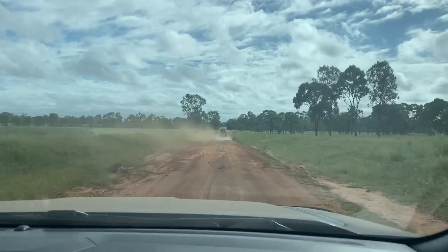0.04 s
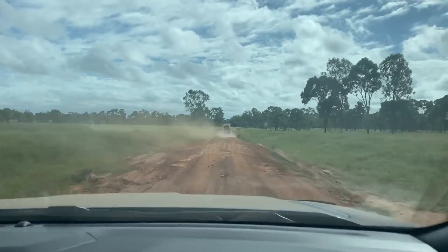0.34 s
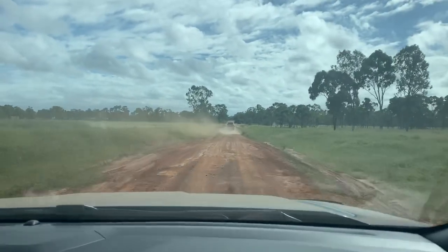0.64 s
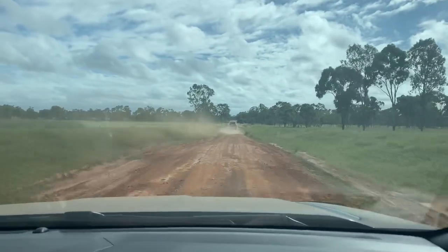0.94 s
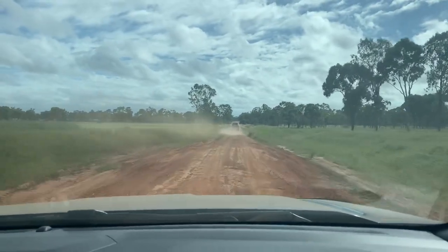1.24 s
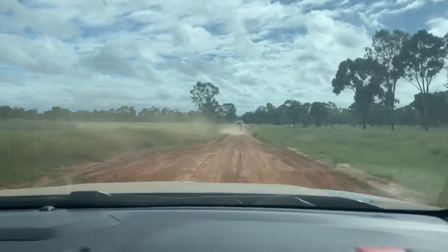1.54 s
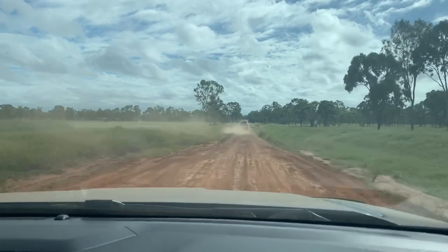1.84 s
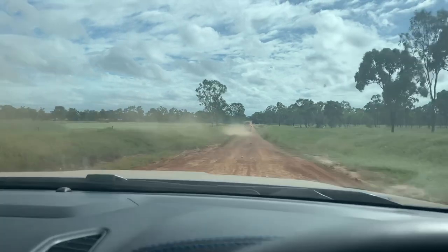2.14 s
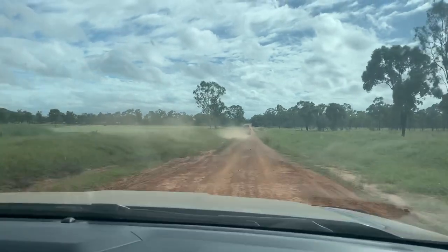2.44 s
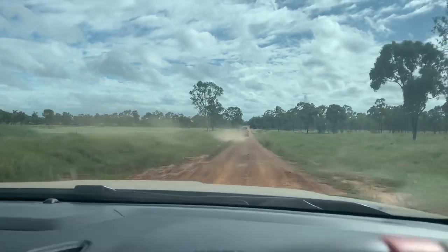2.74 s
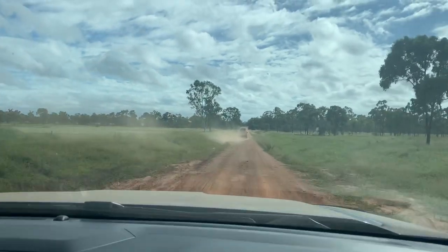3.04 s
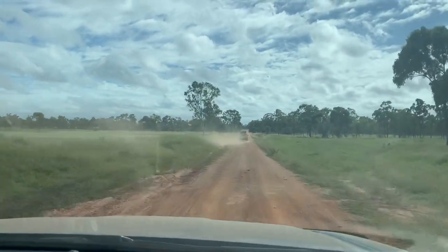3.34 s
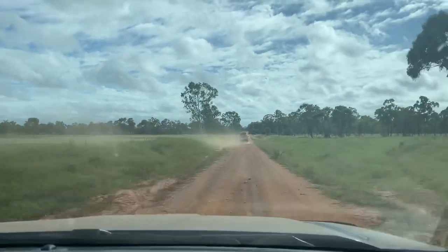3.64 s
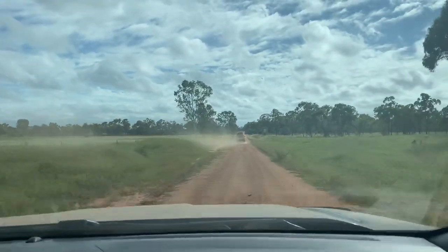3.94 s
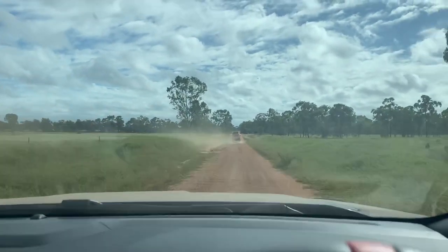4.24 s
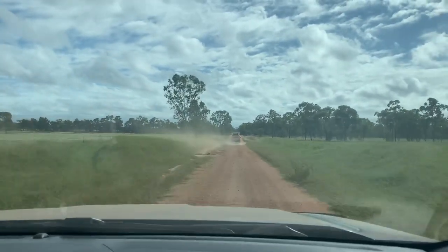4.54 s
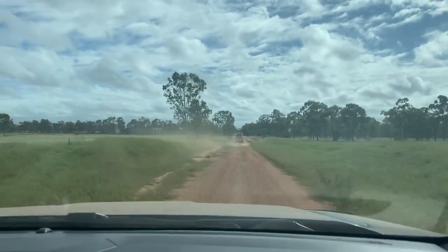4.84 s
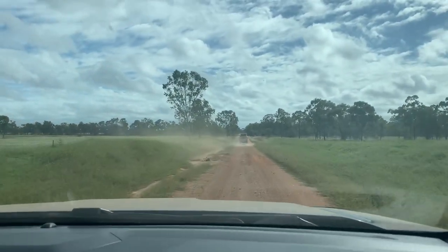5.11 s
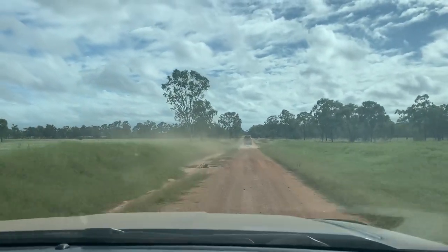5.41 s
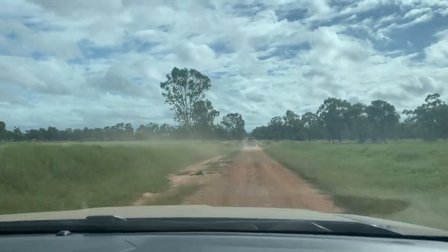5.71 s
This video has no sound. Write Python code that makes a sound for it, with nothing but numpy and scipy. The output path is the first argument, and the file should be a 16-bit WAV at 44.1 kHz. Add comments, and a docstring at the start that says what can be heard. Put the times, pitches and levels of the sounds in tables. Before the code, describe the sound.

From inside a vehicle cab, a deep, uneven chassis rumble and drumming panels run for the whole six seconds, along with the throbbing roar of tyres and a softer crunch of dirt on a corrugated road. At about 0.2 seconds a rut gives a low thud and a suspension knock. Loose trim and gear clink and chatter lightly until around 2.3 seconds, then ease off. A very faint drivetrain whine swells around 3 seconds and slowly fades. At about 3.3 seconds a loose metal piece clanks twice in quick succession, bright and short, over another thud. From 4 seconds the rattling and clinking build again. The roughest part comes between 4.7 and 5.6 seconds, with a cluster of deep thumps and hard knocks, strongest just after 5 seconds, and louder tyre roar and crunch. Rumble and rattle carry on to the end.

```python
"""Cab on a corrugated dirt road.

Ridges shake the chassis and drum the panels over the roar of the tyres; ruts thump the suspension.
Loose trim and gear chatter and clink on the rougher stretches, and a metal piece clanks twice.
A faint drivetrain whine swells on the smooth stretch."""
import sys
import numpy as np
from scipy import signal
from scipy.fft import rfft, irfft, next_fast_len
from scipy.io import wavfile
from scipy.ndimage import uniform_filter1d

SR = 44100
rng = np.random.default_rng(int(sys.argv[2]) if len(sys.argv) > 2 else 0)


def store_pcm(level_fs):
    """Save levels as 16-bit WAV."""
    pcm = np.round(np.clip(level_fs, -1, 1) * 32767).astype(np.int16)
    wavfile.write(sys.argv[1], SR, np.atleast_2d(pcm).T)


N = 263277
TIME_S = np.arange(N) / SR
HIT_S = np.arange(12000) / SR


def road(ridges_hz=23.27, uneven=.35, loose=.68):
    """Wheel force (a kick per uneven ridge plus loose dirt) and the load cycle over the ridges."""
    wander = unit(uniform_filter1d(rng.standard_normal(N), 2000))
    ridges = np.cumsum(ridges_hz * (1 + uneven * wander)) / SR
    kicks = np.diff(np.floor(ridges), prepend=0) * rng.uniform(.58, 1, N)
    force = loose * rng.standard_normal((2, N))
    force[0] += (1 - loose) * unit(kicks - kicks.mean())
    return force, np.cos(2 * np.pi * ridges)


def cab(force, drum_trim_db=.6, swell_s=.018):
    """Road force rings the low chassis modes and drums the panels."""
    # shaking: time_s, rumble_db, drum_db
    shake = [(0.02, -13, -44), (0.1, -34.5, -33), (.18, -17, -31), (0.23, -17.5, -16.5),
             (0.33, -20.5, -32.5), (0.79, -21, -31.5), (1.72, -23.5, -29.5), (1.81, -21, -34.5),
             (2.03, -20.5, -28.5), (3.21, -19, -28), (4.52, -22, -30.5), (4.83, -16.5, -25.5),
             (4.93, -18, -32), (5.19, -24.5, -27), (5.23, -12.5, -29), (5.5, -24, -28), (5.9, -19.5, -27)]
    # brief swells and dips in the rumble and drumming: centre_s, rumble_lift_db, drum_lift_db
    swells = [(.971, -9, -7), (1.124, -7, 3), (1.284, 3, 4.5), (1.356, -3, -3), (1.457, -5, -10),
              (1.541, 10.5, 3.5), (2.133, 2.5, 10), (2.229, 4.5, -0.5), (2.541, -5.5, -2.5),
              (2.648, -3.5, -2), (2.775, -11.5, 0.5), (2.86, 4.5, -5), (2.93, -4.5, 0.5), (3.02, 6.5, 0),
              (3.069, -1, 3), (3.147, -7, -8), (3.268, 1, -11), (3.428, -0.5, 2), (3.931, 0.5, 6.5),
              (4.346, -3, -4), (4.607, 5.5, -4), (4.697, -9, 0.5), (4.949, -10, 2.5), (5.171, 11, 4),
              (5.245, 2, 1), (5.285, -5.5, -2), (5.408, 7.5, 2), (5.733, 2.5, 7), (5.804, 5, -12)]
    # body sway spectrum: freq_hz, level_db
    sway = [(4, -26), (10, -21), (20, -15), (30, -12), (62, -13), (78, -24), (120, -45), (1000, -120)]
    # chassis and cab air resonances: centre_hz, width_hz, level_db
    chassis_modes = [(30, 11, -3), (45, 10, 0), (56, 9, -5), (67, 6, -4)]
    # panel resonances: centre_hz, width_hz, level_db
    panel_modes = [(98, 15.2, -1), (120.1, 25, 2), (145.4, 15, -1), (168, 25, -9.5), (195, 33, -14.5)]
    rumble = stereo(force, lambda hz: np.hypot(amp(read(sway, hz)), modes(chassis_modes, hz)))
    drum = stereo(force, lambda hz: modes(panel_modes, hz))
    swells_db = sum(np.outer(lifts, np.exp(-((TIME_S - s) / swell_s) ** 2)) for s, *lifts in swells)
    rumble_swell, drum_swell = amp(swells_db)
    rumble = rumble_swell * level(shake, column=1) * steadied(rumble, span_s=.085)
    drum = drum_swell * level(shake, column=2) * steadied(drum, span_s=.08)
    return rumble + amp(drum_trim_db) * drum


def ruts(width_share=.17):
    """Each rut gives a deep thud and a suspension knock."""
    # jolts: start_s, thud_db, knock_db, knock_hz, lift_db
    jolts = [(0.2121, -21.5, -42, 1430, 4), (.253, -34, -49.5, 890, 9), (3.3, -27, -50, 300, 9),
             (4.729, -34.5, -47, 2100, 5), (4.756, -28, -50, 330, 16), (4.968, -35, -48, 480, 17),
             (5.048, -20.5, -39, 537, 23), (5.063, -37, -41, 534, 23), (5.141, -24.5, -35.5, 536, 32),
             (5.161, -20, -41, 345, 20), (5.209, -37, -41, 980, 22), (5.242, -32, -42, 1050, 8),
             (5.487, -29.5, -41, 500, 28), (5.577, -30, -50, 485, 22)]
    # thud spectrum: freq_hz, level_db
    thud = [(30, -20), (60, -6), (95, -3), (150, 0), (190, -2), (225, -9), (275, -7), (330, -13),
            (520, -20), (720, -34), (8000, -110)]
    # knock spectrum: freq_hz, level_db
    knock = [(60, -30), (200, -8), (480, 0), (700, -5), (1000, -4), (1480, 1), (2000, -13), (4000, -25),
             (9000, -42), (16000, -60)]
    out = np.zeros((2, N))
    for s, thud_db, knock_db, knock_hz, lift_db in jolts:
        deep = lambda hz: read(thud, hz)
        hard = lambda hz: read(knock, hz) + lift_db * bell(hz, knock_hz, width_share * knock_hz)
        add(out, s, amp(thud_db) * burst(deep, rise_s=.005, t60_s=.125, tail_db=-24, tail_t60_s=.26))
        add(out, s, amp(knock_db) * burst(hard, rise_s=.004, t60_s=.071, tail_db=-13, tail_t60_s=.24))
    return out


def tyres(load, throb_db=.95, lurch_db=1.19, lurch_s=.032, crunch_trim_db=.63):
    """Tread roar and crunching dirt swell with each ridge and each lurch of the body."""
    # rolling noise: time_s, roar_db, crunch_db
    roll = [(0, -42.5, -54), (.4, -41, -54.5), (2.4, -41.5, -52), (3.3, -39.5, -50.5), (4, -41, -52),
            (4.7, -36.5, -51), (4.88, -43, -52.5), (5.05, -35, -48.5), (5.25, -38, -43),
            (5.45, -39.5, -51.5), (5.97, -39, -48.5)]
    # tyre and wheel arch resonances: centre_hz, width_hz, lift_db
    tyre_modes = [(280, 34, 3), (360, 33, 5.5), (420, 31, 4.5), (496, 35, 3.5), (562, 14, 7),
                  (980, 26, -0.5)]
    # tread spectrum: freq_hz, level_db
    roar = [(90, -24.5), (170, -2.5), (225, -1.5), (300, -3), (400, -7), (520, -14), (700, -23),
            (1000, -35.5), (8000, -100)]
    # dirt spectrum: freq_hz, level_db
    crunch = [(300, -7), (600, 1), (850, -0.5), (1100, -5), (1450, -9), (2100, -14), (3000, -24),
              (4200, -30.5), (8000, -42.5), (14000, -68)]
    lurch = unit(smooth(rng.standard_normal(N), lurch_s))
    throb = amp(throb_db * load + lurch_db * lurch)
    resonance_db = lambda hz: sum(db * bell(hz, centre, width) for centre, width, db in tyre_modes)

    def rolling(spectrum):
        noise = rng.standard_normal((2, N)) * throb
        return stereo(noise, lambda hz: amp(read(spectrum, hz) + resonance_db(hz)))
    tread = level(roll, column=1) * rolling(roar)
    dirt = level(roll, column=2) * rolling(crunch)
    return tread + amp(crunch_trim_db) * dirt


def clanks(rise_s=.005, buzz_hz=9, echo_db=-13, echo_loss_db_per_hz=.0015):
    """A loose metal piece clatters on the cab, rings roughly and leaves a duller echo."""
    # strikes: start_s, clatter_db, ring_db, bright_hz, lift_db
    strikes = [(3.2645, -42.5, -44.5, 8600, 9), (3.3366, -37.5, -42, 6200, 4)]
    # metal modes: pitch_hz, first_strike_db, second_strike_db, t60_s
    metal = [(2145, -8, -8, .2), (2565, -3, -1, .15), (2794, 0, -7, .16), (3110, -12, -1, .13),
             (3295, -12, -1, .14), (3397, -1, -14, .14), (3778, -9, -9, .13), (4420, -12, -15, .15),
             (4802, -10, -1, .1), (5020, -6, -2, .06), (5959, -9, 0, .13), (6220, -6, -3, .07),
             (6600, -10, -1, .08), (7340, -18, 0, .055), (8170, -1, -12, .06), (8820, 0, -11, .075),
             (9880, -6, -12, .08), (11610, -14, -3, .06), (12900, -11, 2, .075), (13350, -4, -12, .09)]
    # colour of the clatter: freq_hz, level_db
    tone = [(1000, -25), (1750, -10), (2150, -1), (2600, 2), (3300, -2), (4100, -8.5), (5000, -5),
            (6300, -4), (7700, -11), (9500, -7), (10800, -16), (13100, -6), (14000, -17)]
    out = np.zeros((2, N))
    for strike, (s, clatter_db, ring_db, bright_hz, lift_db) in enumerate(strikes):
        spot = part_modes(peaks_db=3.5, patches_db=.5)
        colour = lambda hz: read(tone, hz) + spot(hz) + lift_db * bell(hz, bright_hz, width_hz=740)
        dulled = lambda hz: colour(hz) - echo_loss_db_per_hz * hz
        clatter = burst(colour, rise_s=.0074, t60_s=.072, tail_db=-17, tail_t60_s=.19)
        echo = burst(dulled, rise_s=.01, t60_s=.16, tail_db=-17, tail_t60_s=.3)
        add(out, s - .002, amp(clatter_db) * clatter)
        add(out, s + .012, amp(clatter_db + echo_db) * echo)
        for pitch_hz, *mode_db, t60_s in metal:
            # loose contact: phase drift widens the mode
            buzz = np.cumsum(rng.standard_normal(len(HIT_S))) * np.sqrt(2 * np.pi * buzz_hz / SR)
            cycles = pitch_hz * HIT_S + rng.random() + rng.random((2, 1)) / 2
            decay = amp(ring_db + mode_db[strike] - 60 * HIT_S / t60_s)
            add(out, s, decay * (1 - np.exp(-HIT_S / rise_s)) * np.sin(2 * np.pi * cycles + buzz))
    return out


def clinks(width_share=.13, rebound_s=.009, rebound_db=-4, ping_db=-18, ping_t60_s=.12):
    """Loose gear knocks and rebounds once, with a faint ping at each part's resonance."""
    # knocks: start_s, level_db, tilt_db_per_octave, ring_hz, lift_db
    knocks = [(.199, -59, 1, 8400, 7), (.215, -52.5, -7.5, 3300, 6), (.26, -51.5, -3.5, 9600, 9),
              (.295, -55.5, -7.5, 3400, 10), (.503, -53.5, -8, 3100, 0), (.532, -57.5, -2.5, 3500, 2),
              (.595, -60, 2, 8300, -4), (0.656, -60.5, 2, 8300, 1), (.795, -57.5, -1.5, 2960, 9),
              (.828, -60.5, -3.5, 2880, 7), (1.053, -55, -2.5, 4730, 7), (1.085, -56, -6, 2820, 4),
              (1.11, -56, -16, 1580, 8), (1.14, -61, -3, 2700, 10), (1.167, -56, -2.5, 2260, 3),
              (1.256, -56, -12, 1890, 10), (1.32, -55, -5.5, 2070, 4), (1.343, -51.5, -10, 2170, 0),
              (1.363, -51.5, -7.5, 2290, 0), (1.385, -63, -4, 8300, 5), (1.485, -60, -4.5, 5300, 7),
              (1.645, -68, 1, 4730, 2), (1.895, -60, -8.5, 4500, 2), (1.998, -63, -4, 3330, 9),
              (2.08, -57.5, -12, 3550, 10.5), (2.271, -53, -6, 2300, 3), (3.432, -58.5, -8, 5700, 10.5),
              (4.045, -54, -9, 12400, 12), (4.145, -55, -4, 3700, 5), (4.252, -57, -3, 6400, 10),
              (4.3, -57.5, -1, 2860, 11), (4.338, -55, -7, 1830, 4), (4.41, -58, -3, 3200, 6),
              (4.522, -45.5, -1, 4820, 9), (4.556, -55, -9, 1740, 7), (4.616, -51.5, -4.5, 8300, 7),
              (4.695, -49, -4.5, 1390, 5), (4.73, -45.5, -4.5, 2230, 9), (4.745, -52, -9, 2400, 2),
              (4.875, -52.5, -6, 2410, 4), (4.968, -60, 5, 7300, 11), (5.019, -54.5, -1, 12700, 4),
              (5.056, -63, 3, 13200, 11), (5.089, -48, -8, 1900, 2), (5.132, -45, -2, 12200, 1),
              (5.188, -49, -4, 5600, 10), (5.245, -47.5, -1, 1770, 9), (5.371, -48, -5.5, 1466, 10),
              (5.455, -54, -3, 8300, 1), (5.519, -47, -7.5, 3960, 3.5), (5.617, -50.5, -6, 2070, 5),
              (5.732, -56.5, -3, 3620, 8), (5.783, -52, -4.5, 4800, -4), (5.806, -53, -4, 12000, 7),
              (5.83, -57, -4, 2950, 3), (5.864, -50, -6, 2200, 0)]
    # colour of the clinks, with a dip filtered in near 10.6 kHz: freq_hz, level_db
    tone = [(100, -68.5), (500, -22.5), (1200, 2), (2200, 0), (4500, -0.5), (6500, -2), (8600, 0.5),
            (9600, -1.5), (10600, -19), (12000, 0), (13300, -2), (15000, -14.5)]
    out = np.zeros((2, N))
    for s, db, tilt, ring_hz, lift_db in knocks:
        part = part_modes(peaks_db=6, spacing_hz=80, patches_db=.6)
        colour = lambda hz: (read(tone, hz) + part(hz)
                             + tilt * np.log2(np.maximum(hz / ring_hz, .1))
                             + lift_db * bell(hz, ring_hz, width_share * ring_hz))
        hit = burst(colour, rise_s=.0023, t60_s=.092, tail_db=-10.5, tail_t60_s=.3)
        add(out, s - .002, amp(db) * hit)
        delay_s = rebound_s * rng.uniform(.6, 1.4)
        rebound = burst(colour, rise_s=.0015, t60_s=.088, tail_db=-14.5, tail_t60_s=.25)
        add(out, s + delay_s, amp(db + rebound_db) * rebound)
        cycles = ring_hz * HIT_S + rng.random((2, 1)) / 2
        ping = np.sin(2 * np.pi * cycles) * (1 - np.exp(-HIT_S / .003))
        add(out, s, amp(db + lift_db + ping_db - 60 * HIT_S / ping_t60_s) * ping)
    return out


def chatter(parts=48, taps_per_s=4, bout_s=.3, spread_db=1.5, fizz=.14, trim_db=2):
    """Loose parts, each with its own modes, tap in short bouts over a fizz of grit."""
    # rattle strength: time_s, level_db
    rattle = [(0.03, -65.5), (.45, -69), (0.93, -72), (1.29, -70), (1.57, -72.5), (2.65, -79.5), (3.3, -71),
              (3.55, -72), (4.03, -67.5), (4.29, -62.5), (4.47, -61.5), (4.58, -64.5), (4.8, -61.5),
              (5.18, -58.5), (5.48, -60), (5.59, -65), (5.7, -62), (5.8, -59.5), (5.95, -59)]
    # treble colour of the rattle, with a dip filtered in near 10.6 kHz: freq_hz, level_db
    treble = [(300, -37.5), (700, -13), (1500, 1.5), (2800, 2), (3800, -1.5), (4900, 2.5), (6000, -4),
              (7600, -5), (8400, -2), (9600, -3.5), (10600, -19.5), (12000, -5.5), (13300, -7.5),
              (15000, -16.5), (17000, -40)]
    taps, length_s = np.zeros((2, N)), N / SR
    for pitch_hz in np.geomspace(1700, 13500, parts):
        part = part_modes(peaks_db=5.5)
        colour = lambda hz: read(treble, hz) + part(hz) + 7 * bell(hz, pitch_hz, width_hz=350)
        ring = burst(colour, rise_s=.003, t60_s=.1, tail_db=-16, tail_t60_s=.16)
        starts_s = rng.uniform(0, length_s, 6)
        for bout, offset, force in rng.random((100, 3))[:int(taps_per_s * length_s)]:
            s = starts_s[int(bout * len(starts_s))] + bout_s * offset
            add(taps, s % length_s, amp(spread_db * (2 * force - 1)) * ring)
    grit = stereo(rng.standard_normal((2, N)), lambda hz: amp(read(treble, hz)))
    return amp(trim_db) * level(rattle, column=1) * steadied(unit(taps) + fizz * grit, span_s=.11)


def whine(pitch_hz=925, width_hz=18, peak_db=-61, peak_s=3.1, fade_db_per_s=2.5):
    """Drivetrain whine: a narrow noise band that swells and fades."""
    tone = stereo(rng.standard_normal((2, N)), lambda hz: bell(hz, pitch_hz, width_hz))
    return amp(peak_db - fade_db_per_s * abs(TIME_S - peak_s)) * steadied(tone, span_s=.075)


def burst(colour_db, rise_s, t60_s, tail_db, tail_t60_s):
    """A blow on densely ringing panels: quick rise, decay, short cab echo."""
    noise = stereo(rng.standard_normal((2, len(HIT_S))), lambda hz: amp(colour_db(hz)))
    decay = amp(-60 * HIT_S / t60_s) + amp(tail_db - 60 * HIT_S / tail_t60_s)
    shape = (1 - np.exp(-(HIT_S / rise_s) ** 2)) * decay
    return steadied(noise, span_s=.068) * shape / shape.max()


def part_modes(peaks_db, spacing_hz=70, patches_db=2):
    """Irregular peaks and dips of a small part, as dB against frequency."""
    grid_hz = np.arange(0, SR / 2, spacing_hz)
    fine, broad = rng.standard_normal((2, 800))[:, :len(grid_hz)]
    db = peaks_db * np.minimum(fine, 2) + patches_db * unit(uniform_filter1d(broad, size=9))
    return lambda hz: np.interp(hz, grid_hz, db)


def stereo(pair, gain):
    """Blends two unrelated signals into left and right, coloured by gain(hz), at unit rms."""
    # channel likeness: freq_hz, coherence
    likeness = [(30, .995), (70, .99), (125, .965), (250, .78), (500, .45), (1000, .42), (2000, .5),
                (4000, .55), (8000, .6), (12000, .8)]
    # phase between channels: freq_hz, left_lead_rad
    lead = [(250, 0), (600, .6), (950, -.6), (1550, 2.6), (2760, -1.2), (3790, 0), (5000, 3), (6890, -2),
            (8100, 0), (9900, 2), (11000, 0)]
    # balance: freq_hz, left_minus_right_db
    tilt = [(70, 1), (200, -.3), (1000, -.3), (2200, -1.2), (7600, 0), (8300, 5), (9600, 3), (10500, 0)]
    size = next_fast_len(pair.shape[1])
    hz = np.fft.rfftfreq(size, 1 / SR)
    a, b = rfft(pair, size)
    coherence = np.clip(read(likeness, hz), 0, 1)
    mid, side = np.sqrt((1 + coherence) / 2) * a, np.sqrt((1 - coherence) / 2) * b
    lean = amp(read(tilt, hz) / 2) * np.exp(.5j * read(lead, hz))
    spectra = np.array([(mid + side) * lean, (mid - side) / lean]) * gain(hz)
    return unit(irfft(spectra, size)[:, :pair.shape[1]])


def modes(table, hz):
    """Gain of resonances added in power."""
    return np.sqrt(sum((amp(db) * bell(hz, centre, width)) ** 2 for centre, width, db in table))


def bell(hz, centre_hz, width_hz):
    """Gain of one resonance."""
    return 1 / (1 + ((hz - centre_hz) / (.78 * width_hz)) ** 2)


def steadied(x, span_s):
    """Evens out power over spans longer than span_s."""
    power = smooth((x ** 2).mean(0), span_s)
    return unit(x / np.sqrt(abs(power) + 1e-6))


def smooth(x, span_s):
    """Two passes of a moving average."""
    size = int(span_s * SR)
    return uniform_filter1d(uniform_filter1d(x, size), size)


def amp(db):
    """Decibels to gain."""
    return 10 ** (np.asarray(db) / 20)


def unit(x):
    """Scales to unit rms."""
    return x / np.sqrt(np.mean(x ** 2) + 1e-20)


def read(points, hz):
    """Interpolates a table in log frequency."""
    freq_hz, value = np.transpose(points)
    return np.interp(np.log(hz + 1), np.log(freq_hz + 1), value)


def level(rows, column):
    """Gain over time from a dB column."""
    rows = np.asarray(rows)
    return amp(np.interp(TIME_S, rows[:, 0], rows[:, column]))


def add(mix, start_s, sound):
    """Mixes in a stereo sound."""
    part = mix[:, max(round(start_s * SR), 0):][:, :sound.shape[1]]
    part += sound[:, :part.shape[1]]


def scene():
    """Everything heard in the cab."""
    force, load = road()
    return cab(force) + tyres(load) + whine() + chatter() + ruts() + clinks() + clanks()


def record(dry):
    """Steep low-pass."""
    cutoff_hz = 14300
    lowpass = signal.firwin(255, cutoff_hz, window=("kaiser", 8), fs=SR)
    return signal.oaconvolve(dry, lowpass[None], "same")


dry = scene()
out = record(dry)
store_pcm(out)
```